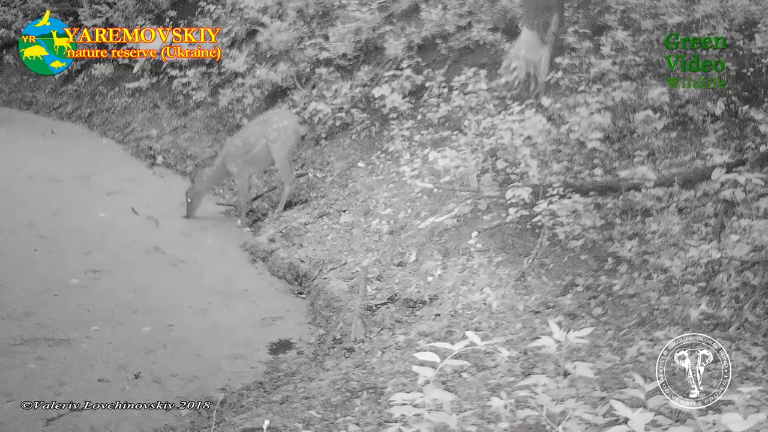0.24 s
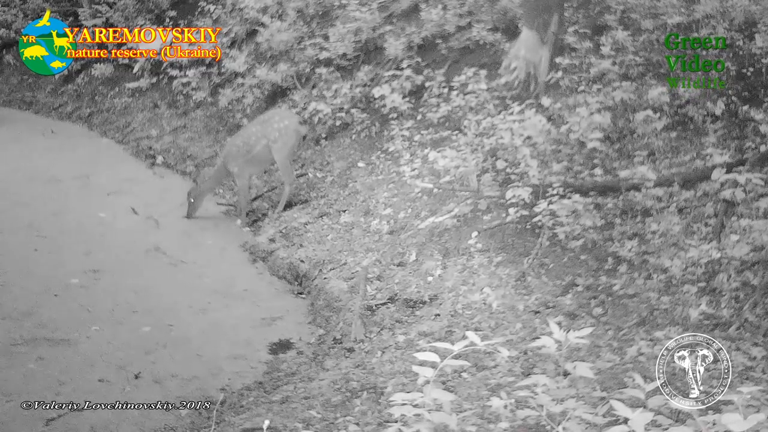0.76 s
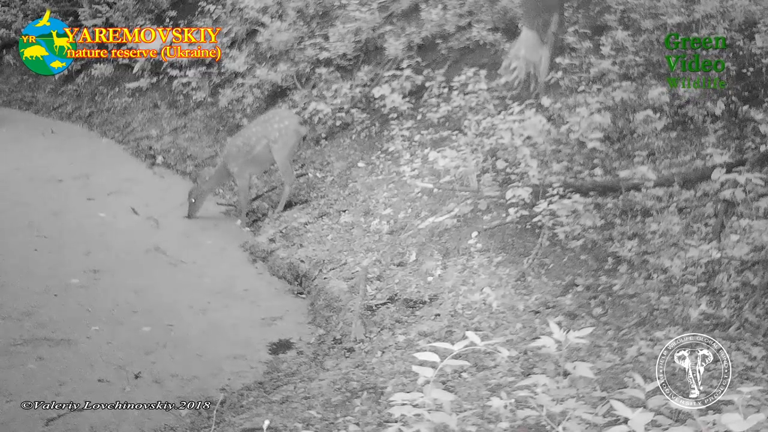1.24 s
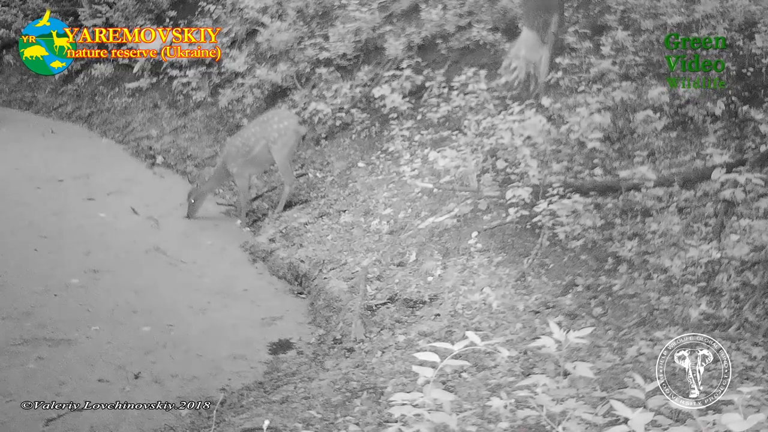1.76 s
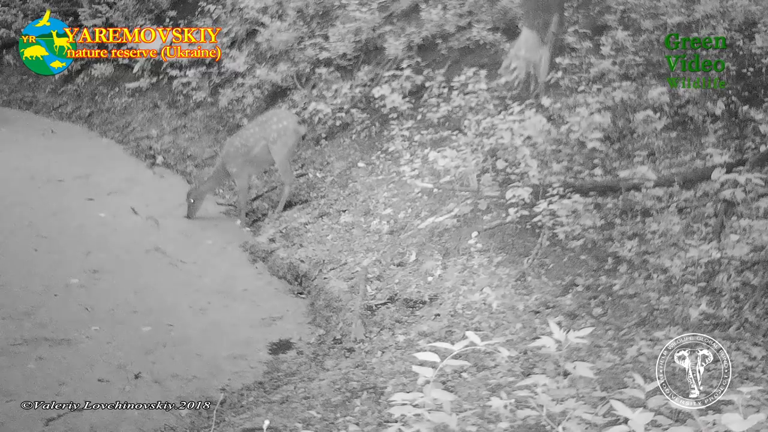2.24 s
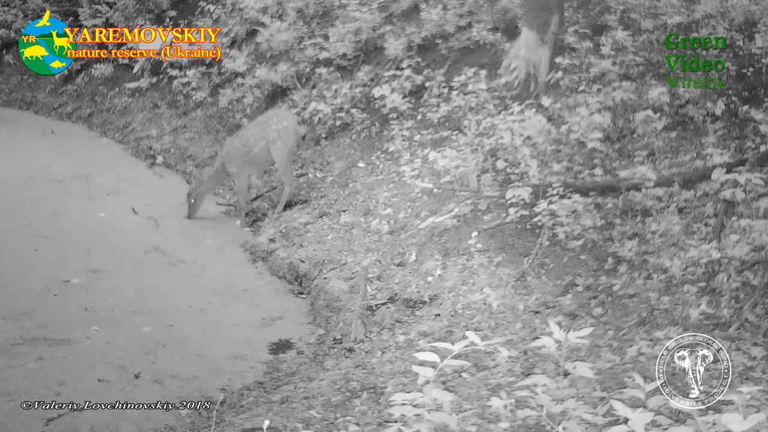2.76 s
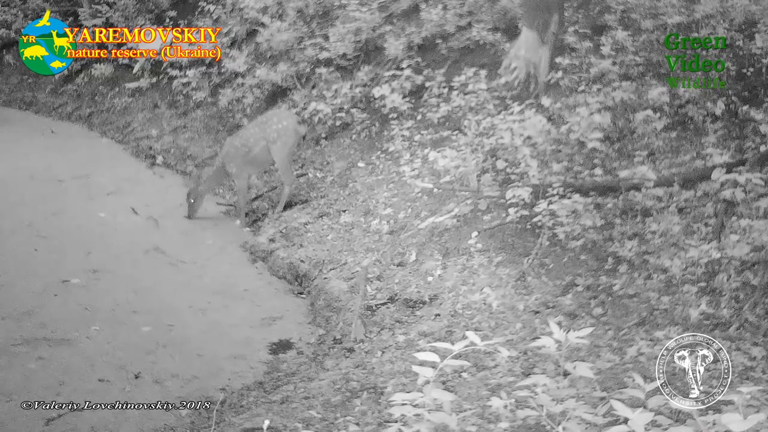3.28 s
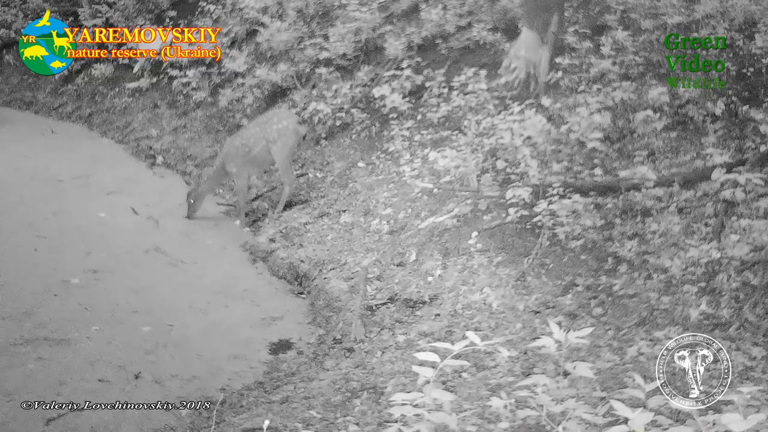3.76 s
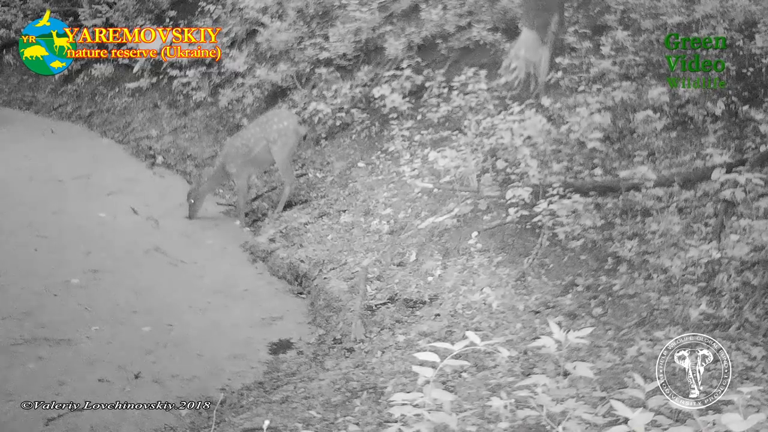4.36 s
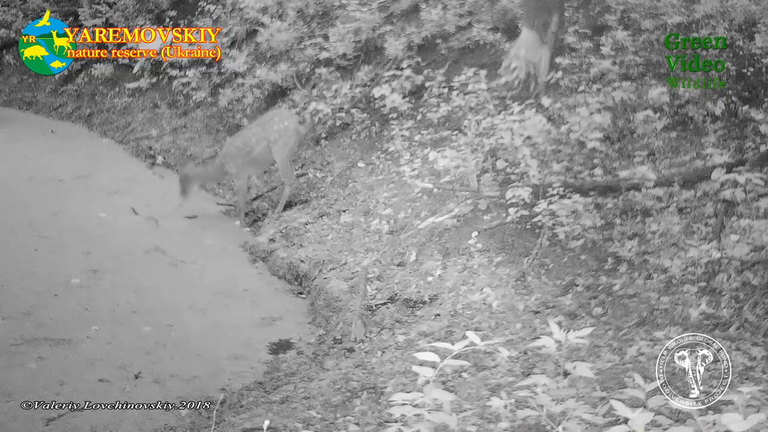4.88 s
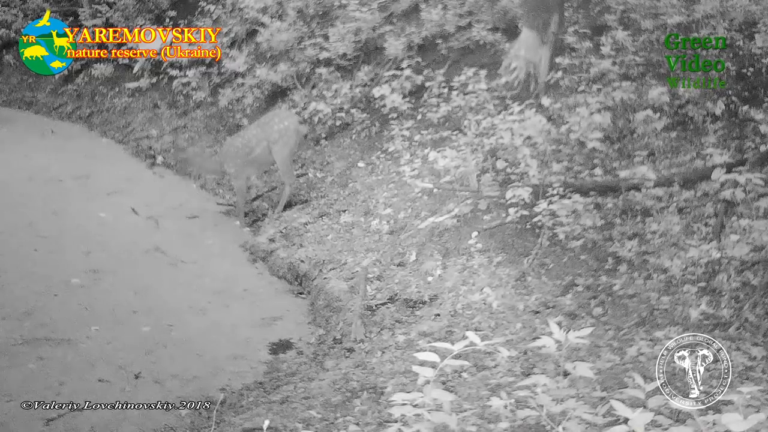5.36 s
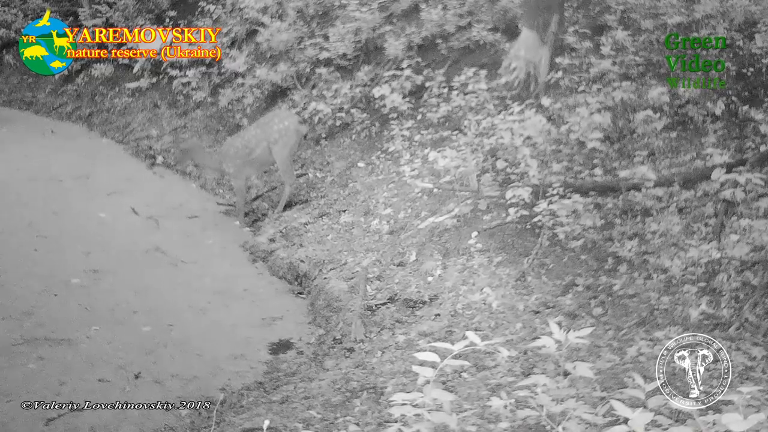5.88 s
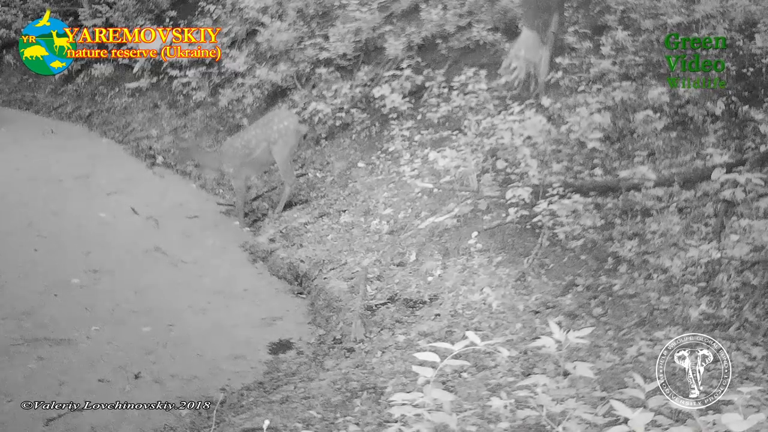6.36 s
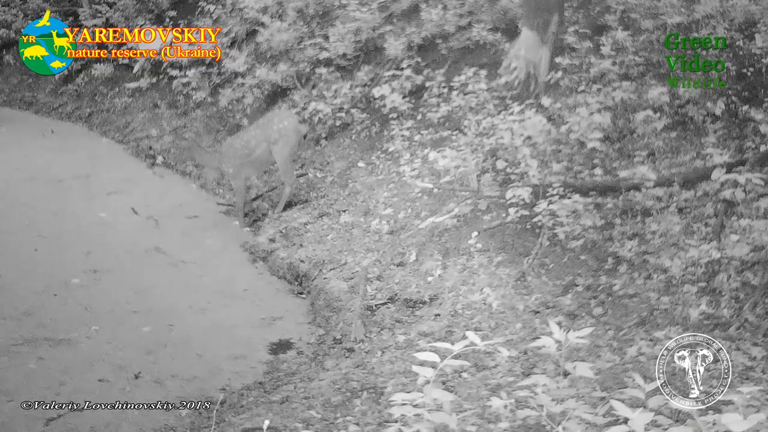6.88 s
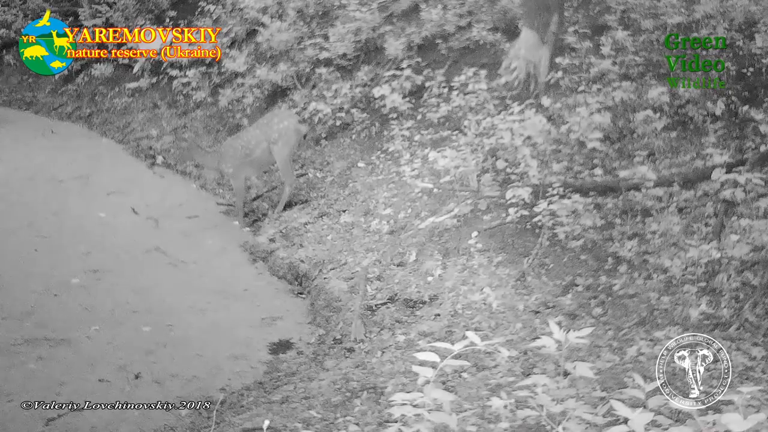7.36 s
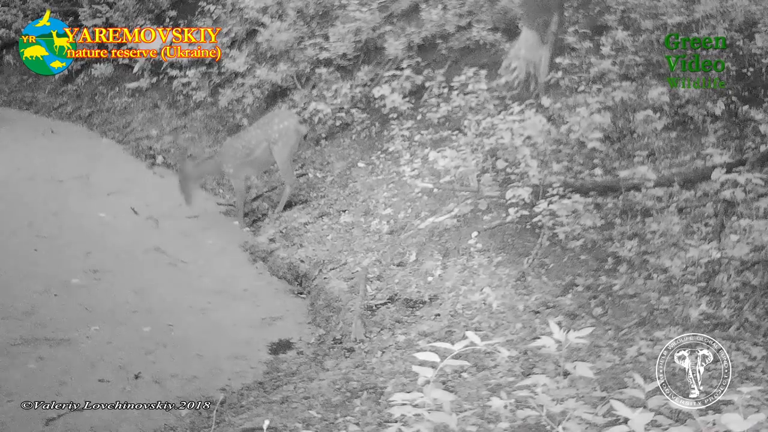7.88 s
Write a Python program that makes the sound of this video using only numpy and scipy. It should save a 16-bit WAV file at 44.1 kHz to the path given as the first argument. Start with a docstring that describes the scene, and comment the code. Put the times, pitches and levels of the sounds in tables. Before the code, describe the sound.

A nearby bush cricket sings at a forest pond at night, scraping out high, raspy pulses about eleven times a second, slightly blurred by the foliage. After a single stroke at the start, it runs from about 0.5 to 1.7 seconds, 2 to 3.6, 3.9 to 5.5, and from 6 until the end at around 8 seconds. Behind it, a distant insect chorus shimmers continuously in the same high range, with two thin, wavering whistles inside it. An animal drinks quietly: a couple of tiny drips fall in the first second, then scattered plinks come from 4 seconds onward, clearest near 4.8 and 6.9 seconds. Very faint sloshes and leaf ticks occur at the start, near 3 seconds, between 4 and 6, and around 7.7. The small microphone adds a soft, low hiss that swells with the song.

```python
"""Forest pond at night. A near bush-cricket scrapes its wings about 11 times a second, in long runs with short
pauses; foliage scatters the song. A far chorus fills the same high band, with two thin whistles wavering in it.
Leaves tick, water sloshes and drops plink where an animal drinks. A small microphone adds hiss that swells with
the song, and a faint mirror image of the song sounds below 8 kHz."""
import sys
import numpy as np
from scipy import signal
from scipy.fft import rfft, irfft, next_fast_len
from scipy.io import wavfile

SR = 44100
rng = np.random.default_rng(int(sys.argv[2]) if len(sys.argv) > 2 else 0)


def transcribe(signal):
    """Save signal, clipped to [-1, 1], as a 16-bit WAV file at the path in sys.argv[1]."""
    frames = np.atleast_2d(signal).T
    limited = np.clip(frames, -1, 1)
    pcm = np.round(limited * 32767).astype(np.int16)
    wavfile.write(sys.argv[1], SR, pcm)


N = 358533

# near cricket, one table per run, first to last stroke: time_s, period_s, level_db
CRICKET_RUNS = [
    [(0.0, .087, -38)],
    [(.476, 0.075, -38), (.638, .0909, -38), (1.084, 0.084, -32), (1.605, 0.094, -34)],
    [(1.994, 0.084, -35.5), (2.336, .0808, -32.5), (2.854, .0943, -33), (3.481, 0.076, -36)],
    [(3.932, 0.089, -36), (4.027, .0865, -33.5), (4.545, 0.088, -32.5), (4.979, 0.0867, -32),
     (5.431, 0.094, -34.5)],
    [(5.978, 0.088, -37), (6.074, 0.076, -35), (6.403, 0.093, -31.5), (7.379, .0875, -33),
     (8.101, 0.09, -33.5)],
]
# effort within a stroke, two swells: age_s, gain_db
STROKE_ENVELOPE = [(0, -32), (.008, -4.5), (.02, -3.5), (.028, -16), (.038, -4.5), (.055, -5.5),
                   (.066, -12), (.085, -18.5), (.11, -28)]
# broad wing response: freq_hz, gain_db
WING_SPECTRUM = [(4120, -51), (7000, -24), (7880, -13), (9250, 0), (10100, 3.5), (11200, -1.5),
                 (13000, -8.5), (14200, -24)]
# sharp wing resonances: freq_hz, width_hz, level_db
WING_RESONANCES = [(9094, 20, -19), (9390, 50, -16), (9722, 40, -16), (10130, 60, -14), (10331, 40, -11),
                   (10463, 45, -14), (10774, 45, -17), (10868, 27, -14), (11089, 27, -18), (11441, 14, -17),
                   (11618, 27, -20), (11725, 25, -23), (12000, 30, -24), (12269, 30, -24)]
# wing band delays, high bands lead: centre_hz, lag_s
WING_BAND_LAGS = [(8500, 0.016), (10300, 0.0047), (12000, -0.0068), (13500, -0.00065)]
# far chorus loudness: time_s, level_db
CHORUS_LEVELS = [(0.0, -33), (0.2, -39.5), (0.4, -38.5), (1.3, -34.5), (1.55, -33.5), (1.9, -38.5),
                 (2.33, -35), (3.5, -35.5), (3.95, -38), (4.4, -34), (4.75, -37), (5.43, -33.5), (5.9, -37),
                 (6.4, -35.5), (7.0, -34), (7.88, -37), (8.13, -33)]
# far chorus band: freq_hz, gain_db
CHORUS_SPECTRUM = [(5000, -34), (7000, -20), (7800, -18), (8880, -5), (9400, -1), (10000, -1),
                   (10800, -8.5), (11600, -14.5), (12600, -26), (13600, -35), (14100, -40)]
# thin tones: pitch_hz, level_re_chorus_db
WHISTLE_TONES = [(9483, -13.5), (9555, -13.5)]
# swelling microphone hiss: freq_hz, gain_db
HISS_SPECTRUM = [(8.8, -26), (15, 1), (51, 0.5), (138, -2.5), (2150, -22.5), (3900, -23), (4500, -23),
                 (5850, -24.5), (9900, -120)]
# leaf rustles and sloshes: start_s, level_db, length_s, centre_hz, width_hz
RUSTLE_BURSTS = [(0.014, -44.5, 0.055, 295, 298), (3.024, -46, 0.076, 300, 300),
                 (4.112, -49, 0.054, 2490, 700), (4.113, -48, 0.047, 6200, 2500),
                 (4.117, -47.5, .08, 1150, 900), (4.483, -45, .01, 3500, 5000),
                 (5.181, -52.5, 0.11, 2800, 1500), (5.725, -47, 0.021, 5500, 4000),
                 (5.841, -48, 0.04, 1600, 600), (5.848, -49, .014, 4200, 700),
                 (7.66, -46, 0.021, 1600, 500), (7.649, -48.5, .03, 2600, 400),
                 (7.807, -46, 0.009, 1200, 1500)]
# drops on water: start_s, peak_db, pitch_hz, t60_s
WATER_DROPS = [(0.177, -36.5, 1350, 0.03), (0.6913, -46, 1080, 0.022), (4.128, -37, 2520, 0.026),
               (4.815, -32.5, 1463, 0.098), (5.069, -41, 1480, 0.03), (5.2535, -40, 1740, 0.03),
               (5.2679, -37, 2530, 0.03), (5.2974, -38, 1770, 0.03), (5.747, -37, 1570, 0.027),
               (5.8597, -40, 1590, 0.03), (6.2602, -40, 1510, 0.03), (6.3753, -40, 1320, 0.03),
               (6.4428, -38.5, 2630, 0.034), (6.869, -33.5, 1430, 0.03), (7.019, -40, 3090, 0.03),
               (7.529, -41, 1100, 0.03), (7.665, -38, 2000, 0.03), (7.8101, -39, 1430, 0.03)]

TEETH_PER_S = 7000
FIRST_STROKE_DB, STROKE_SPREAD_DB, STROKE_JITTER_S = -2.5, 1.0, 0.0011
FOLIAGE_T60_S, FOLIAGE_DB = 0.75, -6
CHORUS_LIFT_DB = 2.5
MIRROR_HZ, MIRROR_DB, CUTOFF_HZ = 8000, -19, 14350
HISS_DB, TREBLE_HISS_DB = -39, -54.5
HISS_DB_PER_SONG_DB, HISS_AVERAGING_S = 0.49, 0.11


def amp(db):
    """Decibels to gain."""
    return 10 ** (np.asarray(db) / 20)


def unit_rms(x):
    """Scale to rms 1."""
    return x / np.sqrt(np.mean(x ** 2) + 1e-20)


def curve(rows, t):
    """Linear interpolation of a two-column table."""
    return np.interp(t, *np.transpose(rows))


def coloured(x, spectrum):
    """Filter by (freq_hz, gain_db) points on a log frequency axis."""
    size = next_fast_len(N)
    freq_hz, gain_db = np.transpose(spectrum)
    bins_hz = np.fft.rfftfreq(size, 1 / SR)
    gain = amp(np.interp(np.log(bins_hz + 1), np.log(freq_hz), gain_db))
    return irfft(rfft(x, size) * gain, size)[:N]


def drift(rate_hz):
    """Slow random wander, rms 1."""
    r = np.exp(-80 * np.pi * rate_hz / SR)
    slow = signal.lfilter([1], [1, -2 * r, r * r], rng.standard_normal(N // 40 + 2002))[2000:]
    return np.interp(np.arange(N) / 40, np.arange(len(slow)), unit_rms(slow))


def resonance(x, centre_hz, width_hz):
    """Two-pole band-pass, peak gain 1."""
    r = np.exp(-np.pi * width_hz / SR)
    feedback = [1, -2 * r * np.cos(2 * np.pi * centre_hz / SR), r * r]
    return signal.lfilter((1 - r * r) / 2 * np.array([1, 0, -1]), feedback, x)


def clicks(per_s, spread_db):
    """Random impulses of either sign, rms 1."""
    sizes = amp(spread_db * np.minimum(rng.exponential(1, N), 4)) * rng.choice([-1, 1], N)
    return unit_rms(sizes * (rng.random(N) < per_s / SR))


def wing_strokes():
    """Slightly uneven strokes at each run's pace, with a weaker opener: start_s, level_db."""
    rows = []
    for run in CRICKET_RUNS:
        time_s, period_s, level_db = np.transpose(run)
        start_s = time_s[0]
        while start_s < time_s[-1] + period_s[-1] / 2:
            opening_db = FIRST_STROKE_DB * (start_s == time_s[0])
            rows.append((start_s, np.interp(start_s, time_s, level_db) + opening_db))
            start_s += np.interp(start_s, time_s, period_s)
    scatter = rng.standard_normal((100, 2))[:len(rows)]
    return np.array(rows) + scatter * [STROKE_JITTER_S, STROKE_SPREAD_DB]


def near_cricket(t):
    """File teeth click into the resonant wing; each band follows the stroke with its own lag."""
    power, out = np.zeros(N), np.zeros(N)
    for start_s, level_db in wing_strokes():
        active = (t > start_s - .02) & (t < start_s + .2)
        power += amp(level_db + curve(STROKE_ENVELOPE, t - start_s)) ** 2 * active
    teeth = clicks(TEETH_PER_S, spread_db=2.0)
    wing = unit_rms(coloured(teeth, WING_SPECTRUM))
    for freq_hz, width_hz, level_db in WING_RESONANCES:
        wing += amp(level_db) * unit_rms(resonance(teeth, freq_hz, width_hz))
    for centre_hz, lag_s in WING_BAND_LAGS:
        band = coloured(wing, [(hz, 0 if hz == centre_hz else -12.0) for hz, _ in WING_BAND_LAGS])
        envelope = np.sqrt(np.interp(t - lag_s, t, power))
        out += amp(0.61 * drift(rate_hz=24)) * band * envelope
    return out


def foliage(song):
    """Leaves and trunks scatter the song into a short noisy tail."""
    age_s = np.arange(SR // 2) / SR
    tail = rng.standard_normal(len(age_s)) * amp(-60 * age_s / FOLIAGE_T60_S)
    tail /= np.sqrt(np.sum(tail ** 2))
    return amp(FOLIAGE_DB) * signal.fftconvolve(song, tail)[:N]


def far_chorus(t):
    """Many far singers blend into a grainy, unevenly throbbing band; nearer ones brighten it."""
    grains = unit_rms(coloured(clicks(per_s=9000, spread_db=0.0), CHORUS_SPECTRUM))
    treble = coloured(grains, [(9800, -40), (10500, -6), (11500, -1)])
    grains += (amp(CHORUS_LIFT_DB + 0.88 * drift(rate_hz=10)) - 1) * treble
    return amp(curve(CHORUS_LEVELS, t) + 0.35 * drift(rate_hz=11)) * grains


def whistles(t):
    """Two thin tones waver and swell with the chorus."""
    out = np.zeros(N)
    for pitch_hz, level_re_chorus_db in WHISTLE_TONES:
        rms_db = curve(CHORUS_LEVELS, t) + level_re_chorus_db + 3.0 * drift(rate_hz=2.7)
        phase_rad = 2 * np.pi * pitch_hz * t + 1.1 * drift(rate_hz=2.1)
        out += amp(rms_db) * np.sqrt(2) * np.sin(phase_rad)
    return out


def mirror_image(song, t):
    """Treble folds about MIRROR_HZ and returns faintly below it."""
    folded = song * 2 * np.cos(2 * np.pi * (2 * MIRROR_HZ) * t)
    band_pass = signal.butter(4, [3500, 8500], "band", fs=SR, output="sos")
    return amp(MIRROR_DB) * signal.sosfilt(band_pass, folded)


def microphone_hiss(song):
    """Bass-heavy noise follows the song's power, over faint steady treble noise."""
    pole = np.exp(-1 / (HISS_AVERAGING_S * SR))
    power, _ = signal.lfilter([1 - pole], [1, -pole], song ** 2, zi=[np.mean(song[:2000] ** 2)])
    swell = (power / np.mean(power)) ** (HISS_DB_PER_SONG_DB / 2)
    treble = coloured(rng.standard_normal(N), [(9000, -30), (11500, 0), (13700, 0), (14200, -12)])
    body = coloured(rng.standard_normal(N), HISS_SPECTRUM)
    return amp(HISS_DB) * swell * unit_rms(body) + amp(TREBLE_HISS_DB) * unit_rms(treble)


def rustles(t):
    """Leaves tick and water sloshes: short bursts of band-passed noise."""
    noise, out = rng.standard_normal(N), np.zeros(N)
    for start_s, level_db, length_s, centre_hz, width_hz in RUSTLE_BURSTS:
        swell = np.sin(np.pi * np.clip((t - start_s) / length_s, 0, 1))
        band = resonance(noise, centre_hz, width_hz)
        burst = swell * resonance(band, centre_hz, width_hz)
        burst_rms = np.sqrt(np.sum(burst ** 2) / (length_s * SR))
        out += amp(level_db) * burst / burst_rms
    return out


def drops(t):
    """Each drop rings a main bubble, rising slightly in pitch, and two smaller, shorter ones."""
    out = np.zeros(N)
    small_bubble_ratios = rng.uniform(1.19, 1.89, (len(WATER_DROPS), 2))
    for (start_s, peak_db, pitch_hz, t60_s), ratios in zip(WATER_DROPS, small_bubble_ratios):
        age_s = np.maximum(t - start_s, 0)
        decay_db = 60 * age_s / t60_s
        phase_rad = 2 * np.pi * pitch_hz * age_s
        out += amp(peak_db - decay_db) * np.sin(phase_rad * (1 + 0.2 * age_s))
        for ratio in ratios:
            out += amp(peak_db - 10 - 2.5 * decay_db) * np.sin(ratio * phase_rad)
    return out


def scene():
    """One microphone, same signal on both channels."""
    t = np.arange(N) / SR
    cricket = near_cricket(t)
    song = cricket + foliage(cricket) + far_chorus(t) + whistles(t)
    mono = song + mirror_image(song, t) + microphone_hiss(song) + drops(t) + rustles(t)
    return np.array([mono, mono])


def record(dry):
    """Steep low-pass at CUTOFF_HZ."""
    return signal.sosfilt(signal.ellip(12, .2, 70, CUTOFF_HZ, fs=SR, output="sos"), dry)


dry = scene()
out = record(dry)
transcribe(out)
```